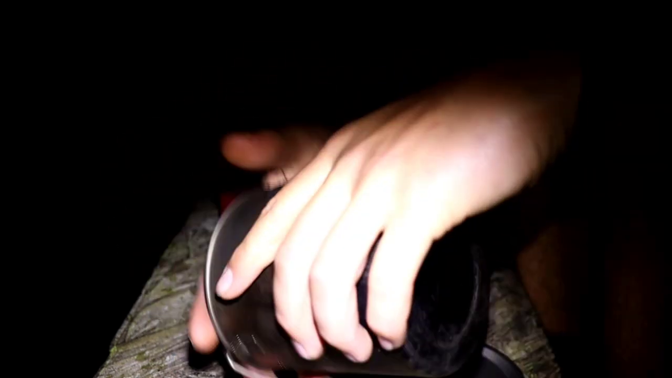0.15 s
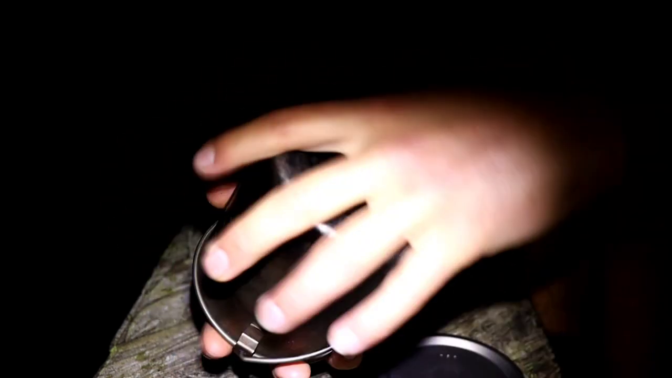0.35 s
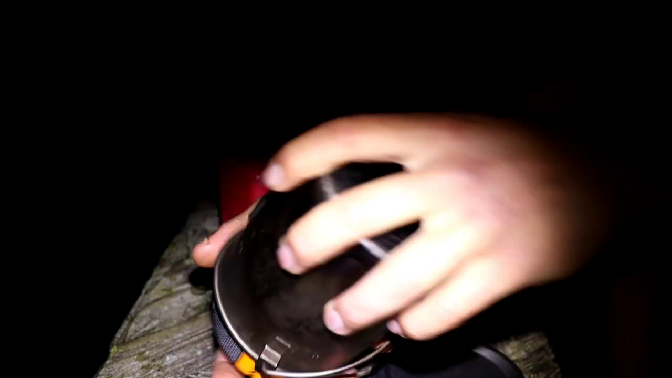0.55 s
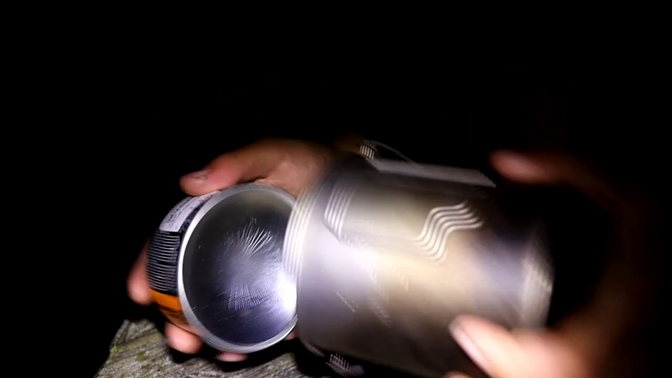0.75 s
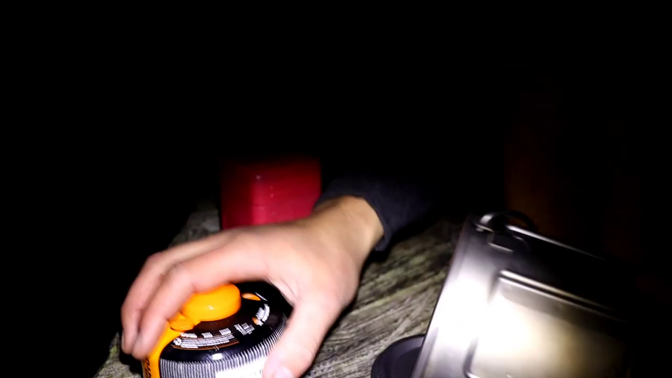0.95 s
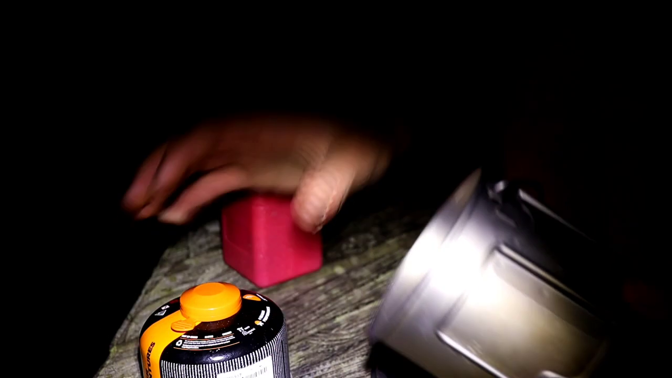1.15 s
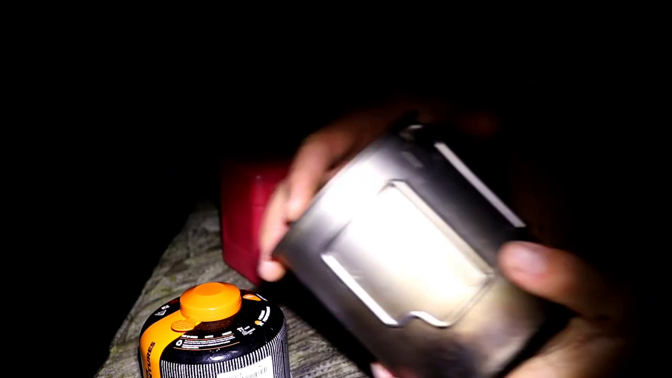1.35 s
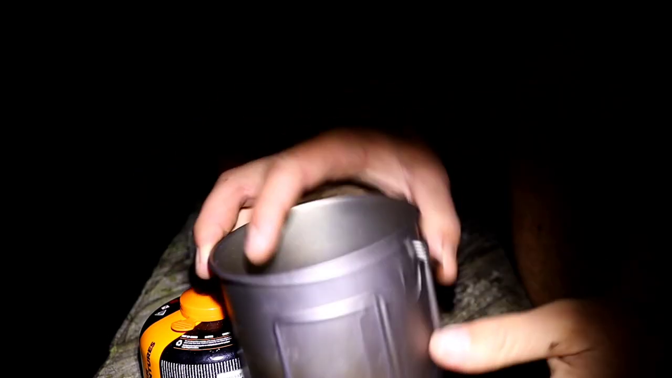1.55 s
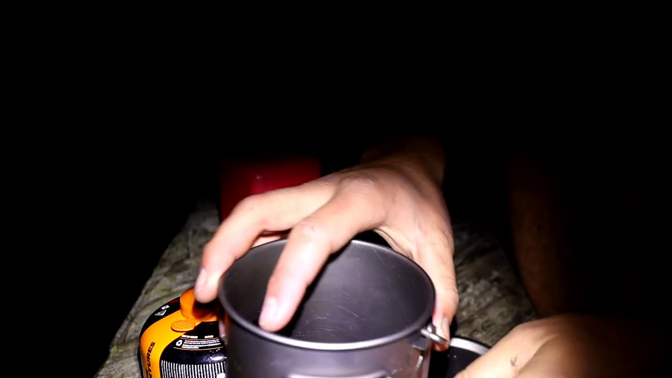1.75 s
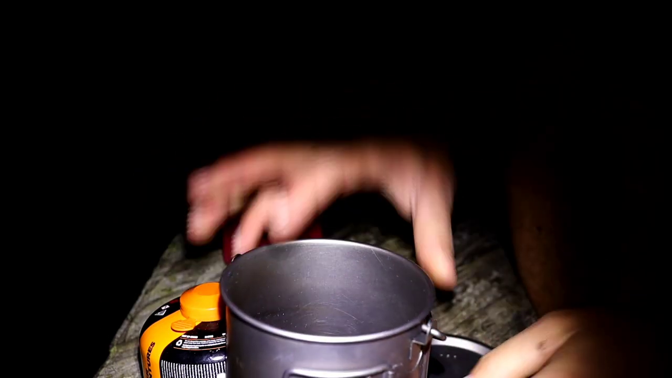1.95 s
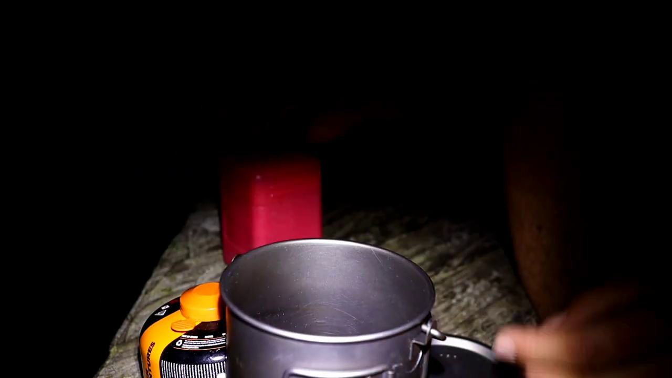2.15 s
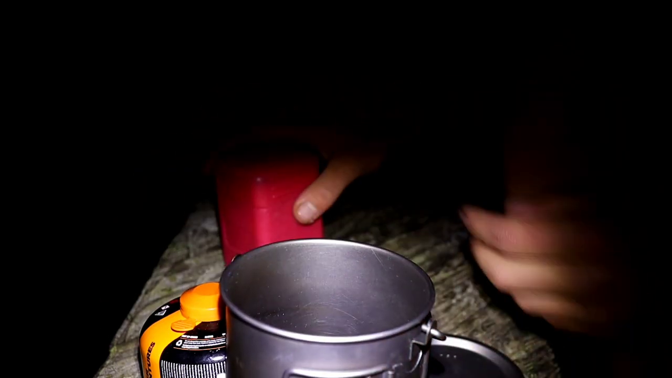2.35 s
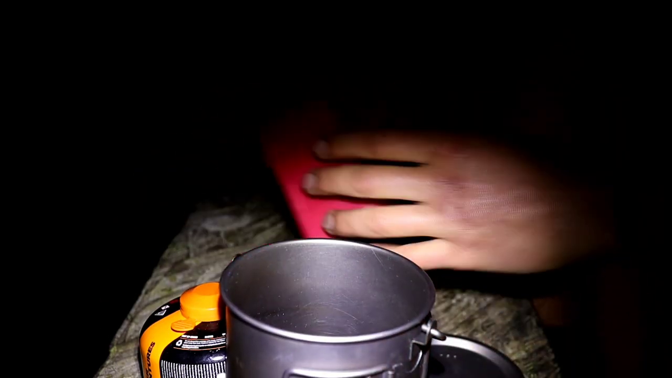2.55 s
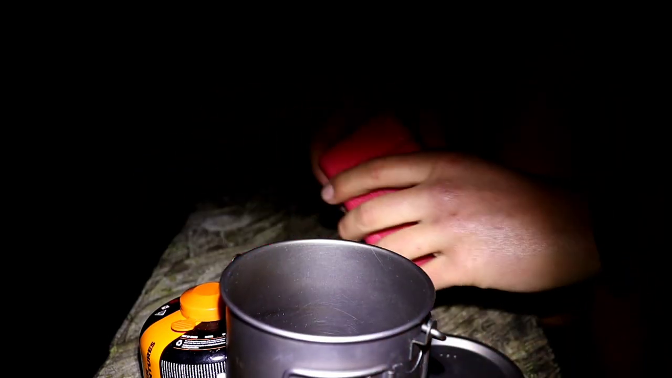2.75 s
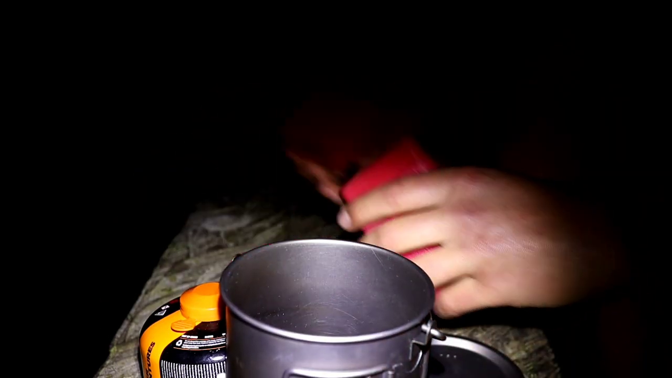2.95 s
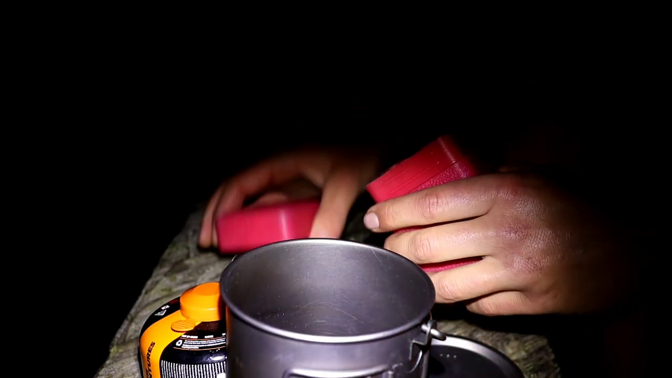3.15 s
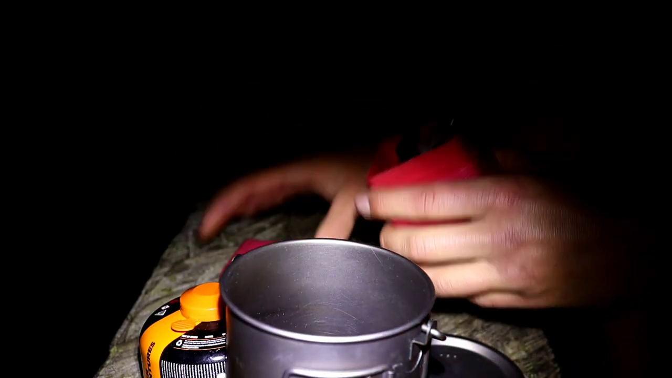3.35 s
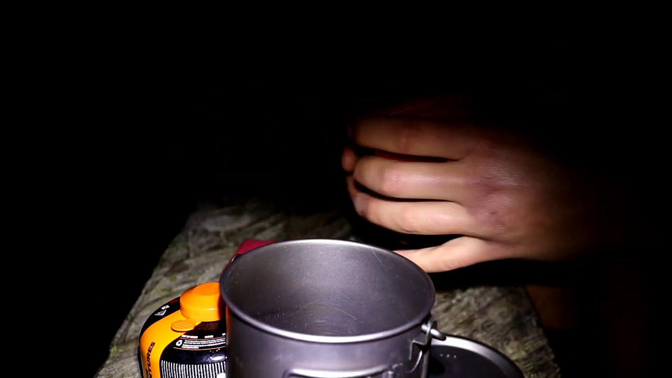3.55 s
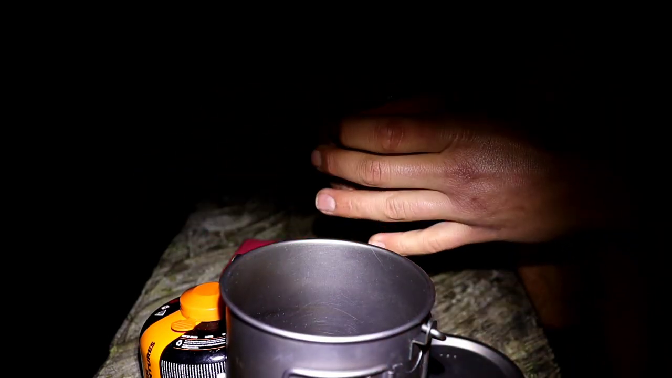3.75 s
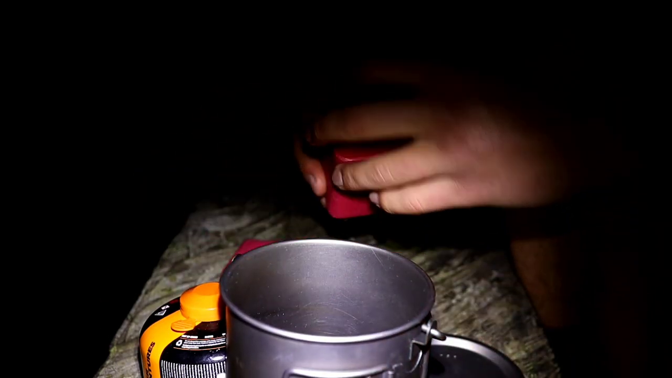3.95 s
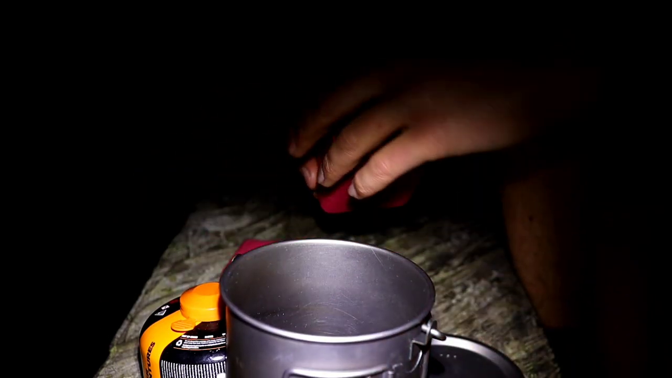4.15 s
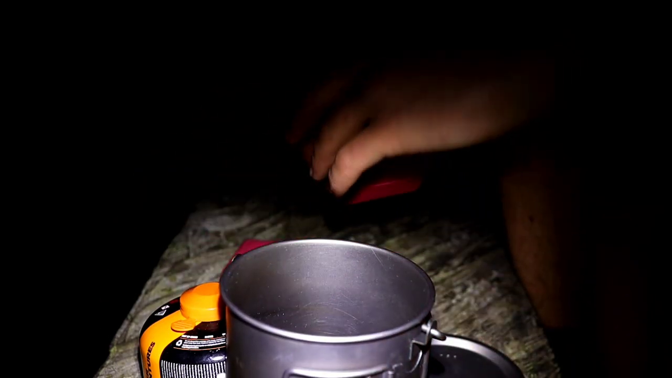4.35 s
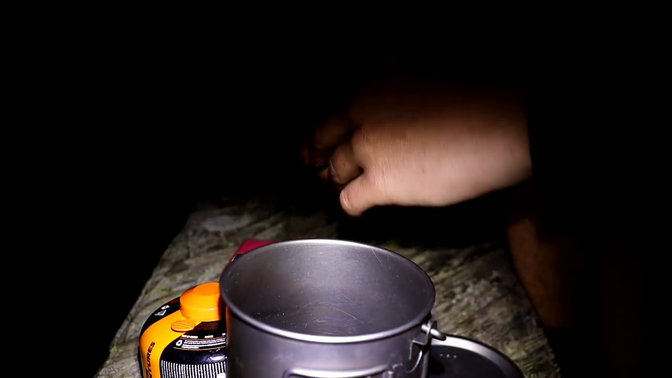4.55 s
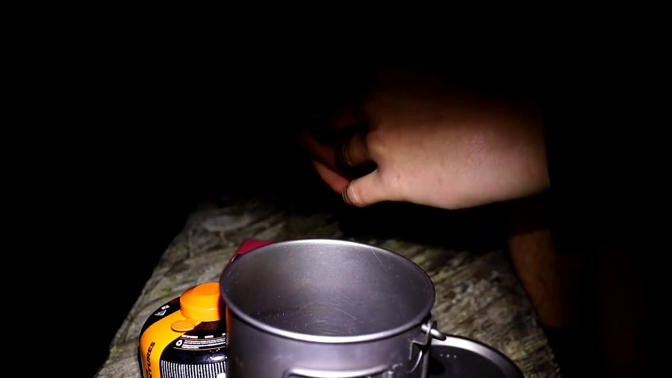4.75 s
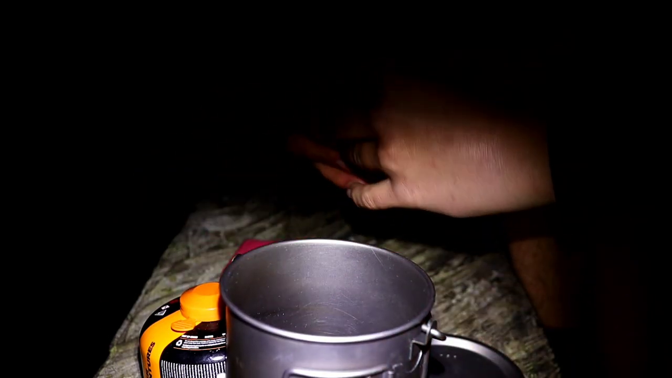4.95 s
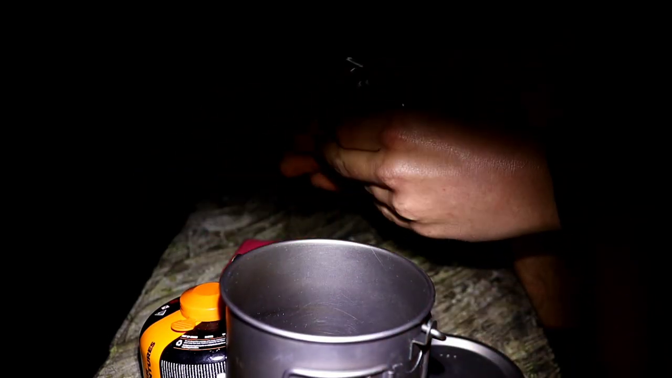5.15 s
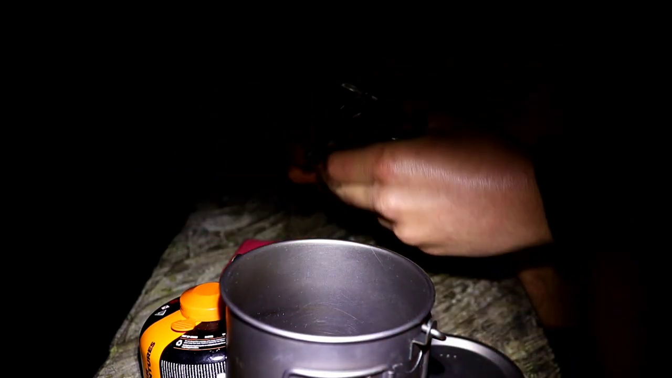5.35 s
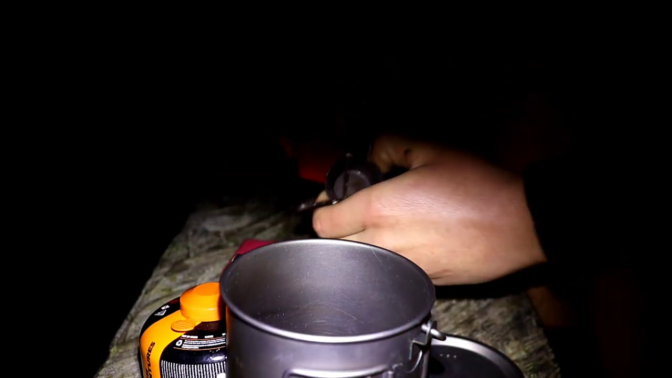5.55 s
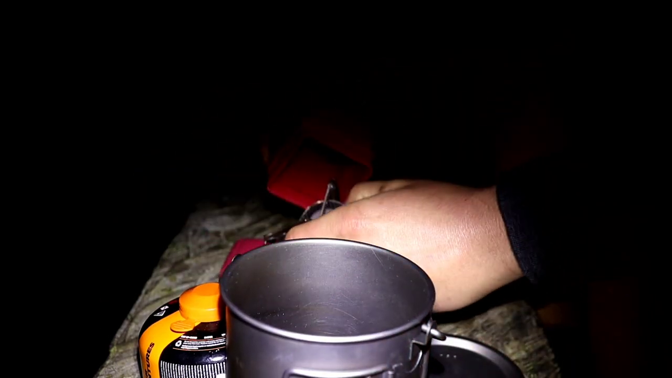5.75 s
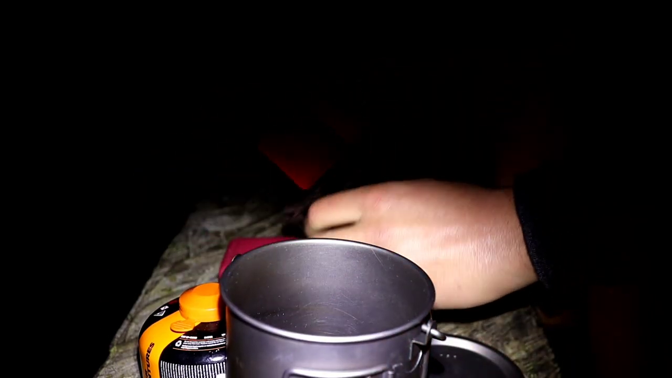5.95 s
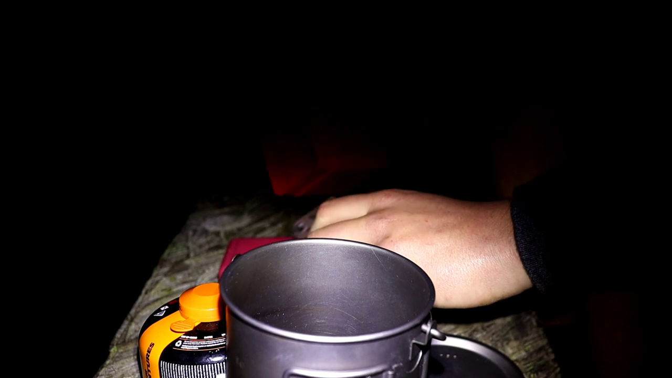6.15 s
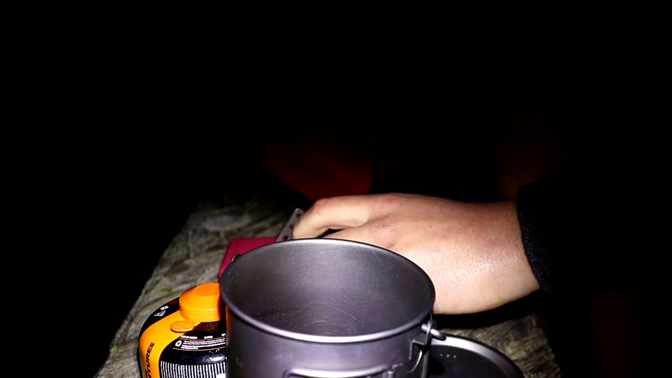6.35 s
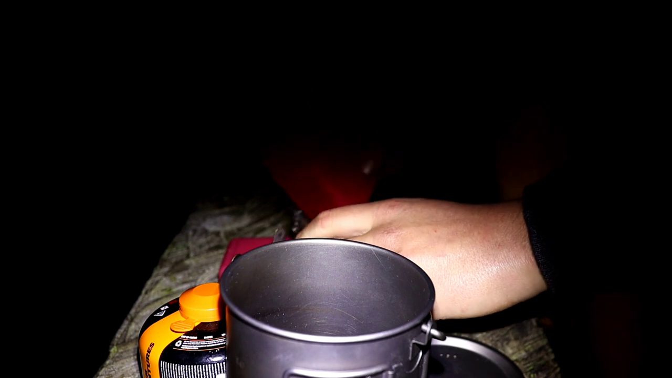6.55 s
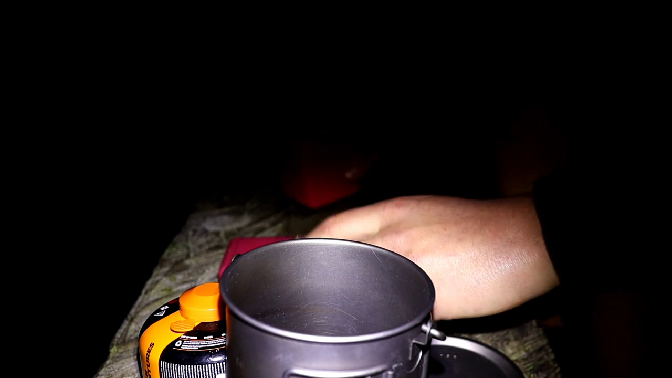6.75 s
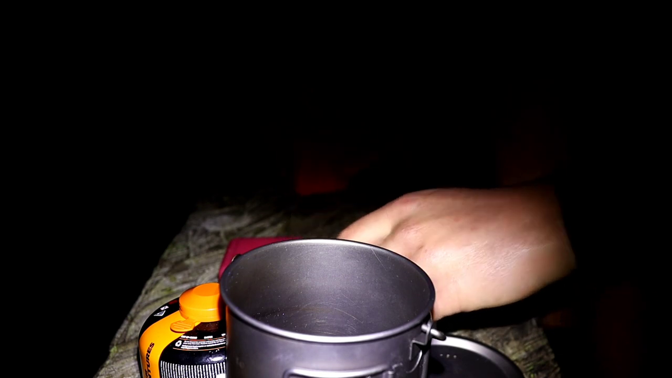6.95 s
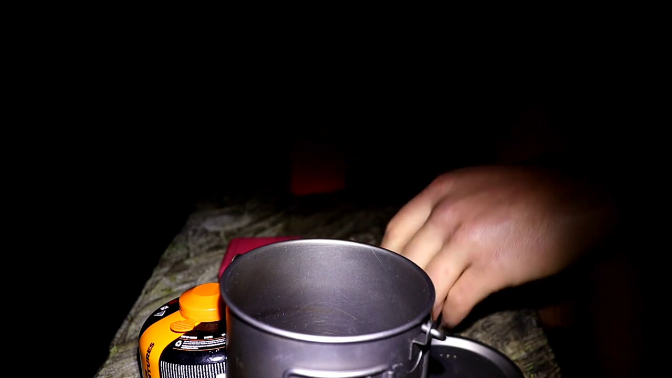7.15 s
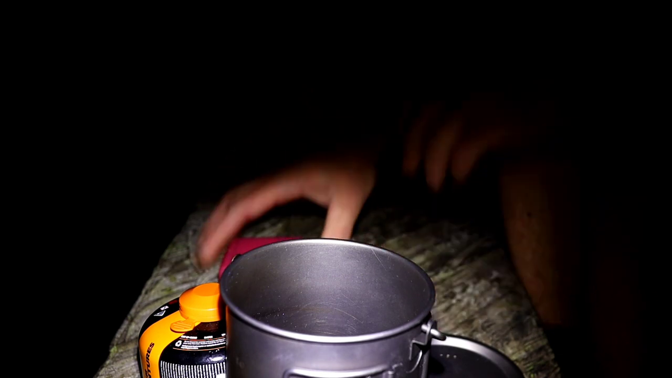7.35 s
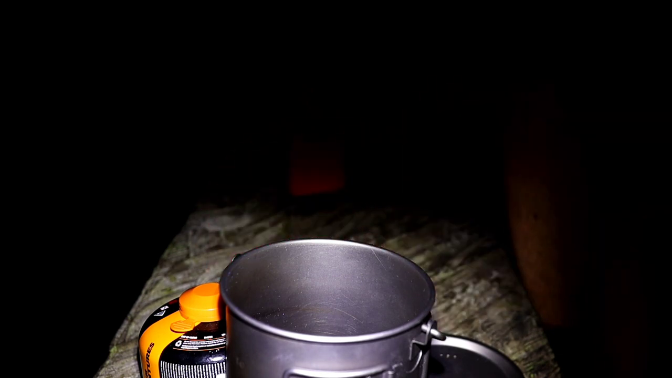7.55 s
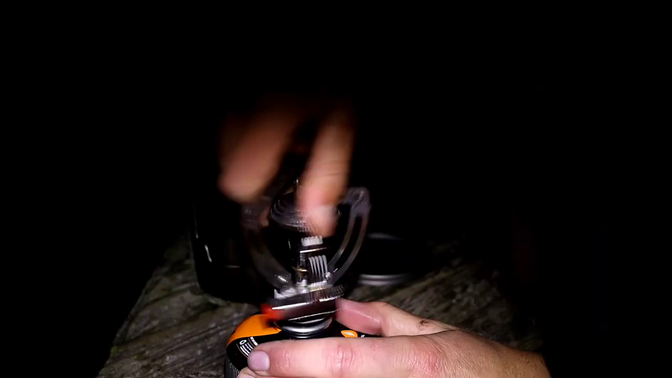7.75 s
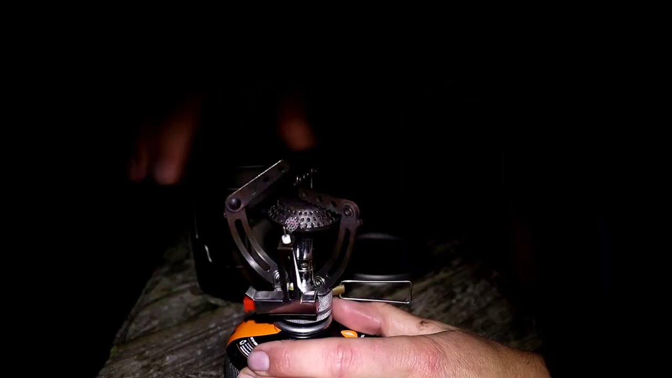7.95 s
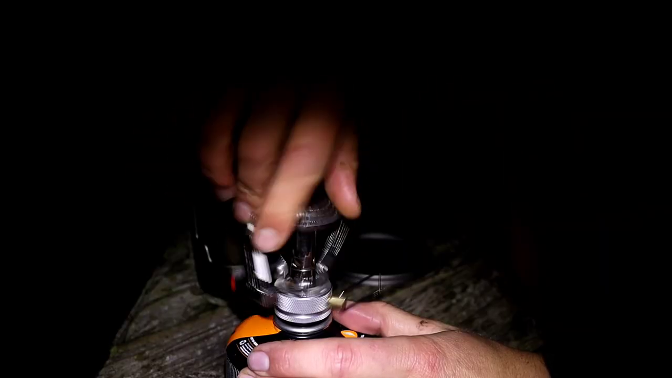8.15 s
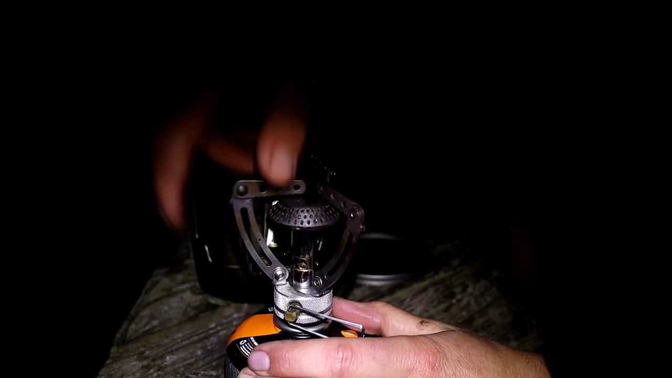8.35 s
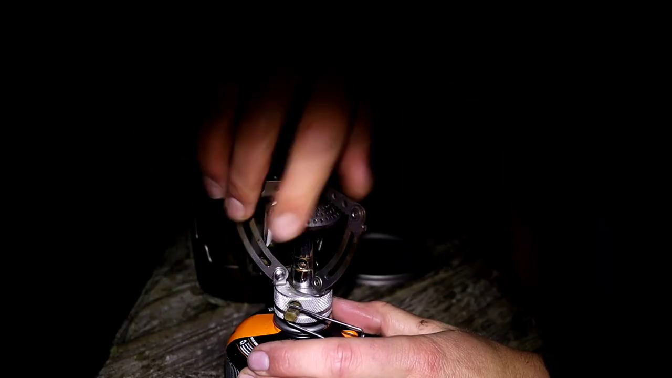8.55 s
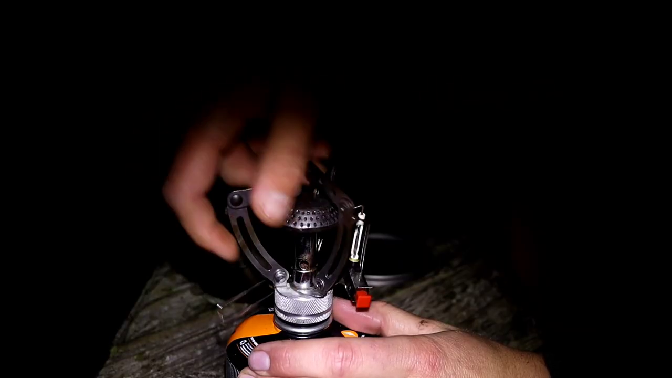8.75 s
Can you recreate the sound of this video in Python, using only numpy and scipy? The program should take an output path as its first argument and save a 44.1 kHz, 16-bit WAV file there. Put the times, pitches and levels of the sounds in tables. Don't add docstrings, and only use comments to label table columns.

```python
import sys
import numpy as np
from scipy import signal
from scipy.fft import rfft, irfft
from scipy.io import wavfile
from scipy.ndimage import uniform_filter1d

SR = 44100
rng = np.random.default_rng(int(sys.argv[2]) if len(sys.argv) > 2 else 0)


def unload_audio(sound):
    columns = np.transpose(np.atleast_2d(sound))
    steps = np.round(np.clip(columns, -1, 1) * 32767)
    wavfile.write(sys.argv[1], SR, steps.astype(np.int16))


def level_to_linear(level):
    exponent = np.asarray(level, float) / 20
    return 10 ** exponent


N = 388962


def evened(x):
    return x / np.sqrt(np.mean(x ** 2) + 1e-20)


def unit(taps):
    return taps / np.linalg.norm(taps)


def coloured(x, points):
    hz, db = np.transpose(points)
    grid = np.fft.rfftfreq(len(x), 1 / SR)
    curve_db = np.interp(np.log(grid + 1), np.log(hz + 1), db)
    return irfft(rfft(x) * level_to_linear(curve_db), len(x))


def taps_of(points):
    return unit(np.roll(coloured(np.eye(1, 1024)[0], points), 512))


def add(mix, s, sound):
    part = mix[max(round(s * SR), 0):][:len(sound)]
    part += sound[:len(part)]


def resonate(x, hz, width):
    turn = np.exp(2j * np.pi * np.cumsum(hz * np.ones(len(x))) / SR)
    r = np.exp(-np.pi * width / SR)
    return 2 * (turn * signal.lfilter([1 - r], [1, -r], x / turn)).real


def ring(modes, length_s, spread_db=0., detune=0.):
    t = np.arange(round(length_s * SR))[:, None] / SR
    hz, db, t60 = np.transpose(modes)
    luck = rng.standard_normal((2, len(hz)))
    wave = np.sin(2 * np.pi * hz * (1 + detune * luck[0]) * t)
    level_db = db + spread_db * luck[1] - 60 * t / np.maximum(t60, .005)
    return (level_to_linear(level_db) * wave).sum(1)


# f/Hz, level/dB per Hz
CRACK = [(2240, -29), (3800, -6), (8560, -5.5), (10900, -21.5), (13500, -12.5), (15700, -25.5),
         (16300, -43)]
# f/Hz, level/dB, T60/s
BOX = [(1915, -1.5, .012), (2427, 4, 0.0087), (2910, 7, 0.0059), (3527, -4, 0.013), (4300, -13.5, 0.018)]


def knock(hz, shell_db, crack_db, t60, cluster_db):
    t = np.arange(round(.13 * SR)) / SR
    places = np.linspace(-1.2, 1.4, 9) + rng.uniform(-.15, .15, 9)
    cluster = [(hz * np.exp(.3 * a), cluster_db - 6.5 - 3.5 * abs(a), t60 * .65) for a in places]
    hollow = ring([(hz, 0, t60)] + cluster, .13, 1.5) * (1 - np.exp(-t / 0.0014))
    rattle = rng.standard_normal(len(t)) * (level_to_linear(-60 * t / 0.015) + level_to_linear(-16.5 - 60 * t / 0.036))
    shell = signal.oaconvolve(rattle, unit(ring(BOX, .03, 2, .03)))[:len(t)]
    noise = rfft(coloured(rng.standard_normal(len(t)), CRACK))
    noise *= level_to_linear(3.0 * evened(uniform_filter1d(rng.standard_normal(len(noise)), size=120)))
    crack = evened(irfft(noise, len(t))) * (level_to_linear(-60 * t / 0.022) + level_to_linear(-18.5 - 60 * t / .07))
    blow = 0.73 * hollow + 1.086 * level_to_linear(shell_db) * shell + 0.93 * level_to_linear(crack_db) * crack
    blow = blow * (1 - np.exp(-t / 0.00033))
    for late, size in rng.random((3, 2)):
        add(blow, .0015 + 0.0092 * late, 0.41 * size * blow.copy())
    return blow / abs(blow).max() * level_to_linear(max(shell_db, crack_db, 0))


def blow(row, shell, t60):
    _, db, hz, crack_db = row[:4]
    return knock(hz, shell[0] + shell[1] * crack_db, crack_db, t60, shell[2])


def arches(rubs, jerks, jerk_edges_db=(-42, -50)):
    rows = []
    for strokes_of, (up, down) in [(rubs, (-13.5, -5.5)), (jerks, jerk_edges_db)]:
        for start, peak, end, hiss, low in strokes_of:
            rows.append([(start, hiss + up, low + up), (peak, hiss, low), (end, hiss + down, low + down)])
    return rows


def strokes(tables, grit_db, per_s):
    t, hiss, rumble = np.arange(N) / SR, np.zeros(N), np.zeros(N)
    for rows in tables:
        s, hiss_db, rumble_db = np.transpose(rows)
        inside = (t > s[0]) & (t < s[-1])
        hiss += inside * level_to_linear(np.interp(t, s, hiss_db))
        rumble += inside * level_to_linear(np.interp(t, s, rumble_db))
    grains = level_to_linear(grit_db * np.minimum(rng.exponential(1, N), 5)) * (rng.random(N) < per_s / SR)
    swell = evened(signal.lfilter([1], [1, -np.exp(-1 / (0.0017 * SR))], grains))
    grit = swell * rng.standard_normal(N)
    return uniform_filter1d(hiss, size=300) * grit, uniform_filter1d(rumble, size=300) * grit


def patchy(x, patchy_db):
    z = signal.stft(x, nperseg=256)[2]
    patches = uniform_filter1d(rng.standard_normal(z.shape), size=3, axis=0)
    patches = uniform_filter1d(patches, size=20, axis=1)
    return signal.istft(z * level_to_linear(patchy_db * evened(patches)), nperseg=256)[1][:N]


# f/Hz, level/dB per Hz
NIGHT = [(15, -38), (25, -1), (387, -11), (455, -15), (805, -5.5), (973, -13.5), (2800, -19), (4820, -16),
         (5670, -20.5), (15100, -27), (16300, -43.5)]
# width f/Hz, level/dB
CRICKETS = [(260, -72.5)]
# t/s, f/Hz
CRICKET_DRIFT = [(0, 4800), (2.2, 5000), (3.299, 5200), (4.602, 4750), (5.2, 5050), (6.5, 4900),
                 (8.82, 4800)]


def night():
    out = level_to_linear(-61) * evened(coloured(rng.standard_normal(N), NIGHT))
    t = np.arange(N) / SR
    hz = np.interp(t, *np.transpose(CRICKET_DRIFT))
    for width, db in CRICKETS:
        slow = uniform_filter1d(uniform_filter1d(rng.standard_normal(N), size=9000), size=9000)
        song_hz = hz * (1 + 0.013 * evened(slow))
        out += level_to_linear(db) * evened(resonate(resonate(rng.standard_normal(N), song_hz, width), song_hz, width))
    return out * level_to_linear(-3 * (t > 7.845))


def nearby_walls(x):
    slots = np.arange(200, 12000, 22)
    at = slots + rng.integers(0, 22, len(slots))
    taps = np.zeros(12100)
    taps[at] = rng.choice([-1., 1.], len(at)) * level_to_linear(-60 * at / SR / 0.18)
    dull = signal.lfilter([1], [1, -.6], taps)
    return signal.oaconvolve(x, unit(dull))[:N]


# f/Hz, level/dB, T60/s
PANEL = [(296, -7, 0.3), (323, -9, 0.15), (614, -18, 0.2), (1017, -17, 0.14), (440, 0, 0.05),
         (563, -10.5, 0.078), (702, -3, 0.13), (930, -10.5, 0.028), (1145, -6, 0.1), (1280, -11.5, 0.13)]
# t/s, boom peak level/dB, panel ring re boom level/dB
THUMPS = [(0.0, -43.5, -8.5), (1.077, -21.5, 4), (1.113, -19.5, 1), (1.823, -25, 9), (2.007, -35.5, 4),
          (2.449, -32, -29), (3.434, -35.5, -8.5), (5.694, -23.5, 2), (5.824, -27.5, -2.5),
          (5.937, -28, -8.5), (6.216, -18.5, 2), (6.81, -40, -10.5), (6.957, -25, -1), (7.21, -39, 5),
          (7.533, -27.5, -27), (7.842, -30.5, -26), (7.865, -49, -21), (7.915, -36.5, -17),
          (7.985, -43, -8), (8.04, -36.5, -11), (8.268, -50, -9), (8.312, -30, -11), (8.36, -30, -11),
          (8.482, -35.5, -14), (8.52, -39.5, -14), (8.609, -36.5, -37.5), (8.8, -30, -13.5),
          (8.768, -29.5, -17)]
BOOM_HZ, BOOM_T60 = 75.4, 0.5


def table_thumps():
    out, t = np.zeros(N), np.arange(round(.6 * SR)) / SR
    sway_hz, sway_t60 = 41, 1
    for s, db, panel_db in THUMPS:
        sway_db = -25 - 0.5 * db
        low_modes = [(BOOM_HZ, 0, BOOM_T60), (sway_hz, sway_db, sway_t60), (sway_hz * .75, sway_db - 5, sway_t60)]
        low = ring(low_modes, len(t) / SR, 0, .01) * (1 - np.exp(-t / 0.0024))
        settling = (t == 0) + .35 * unit(rng.standard_normal(len(t)) ** 3 * level_to_linear(-60 * t / 0.025))
        panel = signal.oaconvolve(ring(PANEL, len(t) / SR, 2, .005), settling)[:len(t)]
        add(out, s, level_to_linear(db) * (low + level_to_linear(panel_db) * panel) * np.cos(np.pi * t / t[-1] / 2))
    return out


# t/s, boom level/dB
TWISTING = [
    (7.6, -43),
    (7.756, -64),
    (7.894, -35),
    (8.272, -47.5),
    (8.31, -34),
    (8.82, -44),
]


def table_twisting():
    out = np.zeros(N)
    s, db = np.transpose(TWISTING)
    t = np.arange(s[0], s[-1], 1 / SR)
    push = rng.standard_normal(len(t))
    shaken = evened(resonate(push, BOOM_HZ, 2.6)) + level_to_linear(-24) * evened(resonate(push, PANEL[0][0], 18.0))
    add(out, s[0], level_to_linear(np.interp(t, s, db) - 11.5) * shaken * signal.windows.tukey(len(t), .1))
    return out


# t/s, blow peak level/dB, hollow f/Hz, crack re blow level/dB
CAN_HITS = [
    (1.077, -4.5, 1280, -60),
    (1.113, -10, 1150, -39),
]


def can():
    out = np.zeros(N)
    for row in CAN_HITS:
        add(out, row[0], level_to_linear(row[1]) * blow(row, (-27.5, .38, -1.5), 0.011))
    return out


# f/Hz, level/dB, T60/s
EMPTY = [(964, -9, 0.08), (1077, -3, 0.08), (1174, -2, 0.08), (1273, -4, .09), (2430, -2, 0.1),
         (2940, -4, 0.058), (3120, -8.5, .05), (4300, -10.5, 0.085)]
# t/s, blow peak level/dB, hollow f/Hz, crack re blow level/dB
BOX_HITS = [(2.476, -24.5, 807, -9.5), (2.545, -22, 800, -9), (2.569, -31.5, 475, -8),
            (2.674, -11, 561, -53.5), (2.695, -23.5, 563, -1), (2.803, -32, 600, -2.5),
            (2.862, -28.5, 708, -20.5), (2.9, -27.5, 516, -21), (3.025, -16, 673, -18.5),
            (2.993, -35, 880, -17), (3.065, -12, 800, -12), (3.072, -2.5, 781, -15.5),
            (3.097, -11, 855, -9), (3.121, -15, 766.7, -17.5), (3.162, -30, 900, -14),
            (3.259, -29, 800, -17.5), (3.264, -14, 848, -26.5), (3.394, -24.5, 780, -24),
            (3.436, -4, 1153, -36.5), (3.453, -6, 1100, -36), (3.446, -16, 1150, -40),
            (3.463, -12, 1100, -40), (3.468, 0.5, 1114, -35), (3.483, -16, 1120, -40),
            (3.527, -20, 1100, -40), (3.546, -24, 1150, -40), (3.472, -7, 1199, -32),
            (3.497, -7.5, 1099, -37.5), (3.509, -13.5, 1235, -41.5), (3.517, -10.5, 1023, -35.5),
            (3.538, -18.5, 1143, -44), (3.564, -29, 1250, -27.5), (3.64, -28.5, 870, 0),
            (3.657, -22.5, 778, -26.5)]
TUGS = [(3.87, -29.5, 1054, -38), (3.92, -31, 890, -22), (3.926, -14.5, 877, -17), (4.202, -36, 770, -34),
        (4.227, -34.5, 600, -21.5), (4.254, -28.5, 576, -29), (4.268, -22.5, 615, -9),
        (4.43, -38.5, 760, -20), (4.531, -35, 765, -16), (4.586, -46, 818, -15.5), (4.879, -36, 600, -20),
        (4.898, -37, 700, -14), (5.055, -41.5, 700, -37), (4.384, -25.5, 747, -20.5),
        (4.732, -27, 780, -57), (4.916, -32, 790, -41), (5.103, -35, 452, -13.5),
        (5.226, -21.5, 576, -36.5), (5.248, -19, 794, -7), (5.263, -12, 627, -21.5),
        (5.277, -10.5, 600, -8), (5.286, -9, 700, -13.5), (5.293, -1, 690, -24), (5.299, -11.5, 760, -7),
        (5.399, -33.5, 720, -28), (5.312, -22, 1037, 2), (5.329, -26, 576, 4)]
TICKS = [(7.74, -46, 900, -15), (7.798, -32, 943, -43), (7.838, -30, 170, -42), (8.267, -47, 400, -17),
         (8.495, -40, 450, -16), (7.842, -38, 452, 4), (7.909, -42, 517.4, 8), (7.958, -43.5, 813, -8),
         (7.984, -34.5, 765, -8.5), (8.039, -36, 724, -10), (8.057, -34.5, 1170, -2.5),
         (8.304, -29.5, 700, -18.5), (8.324, -34, 740, -15.5), (8.336, -40, 1150, -24),
         (8.475, -41, 1200, -26), (8.52, -47, 1200, -22), (8.365, -32.5, 452, -48), (8.462, -37, 1200, -30),
         (8.757, -37, 1180, -6), (8.8, -33, 416.5, 6)]
LATE_HITS = [(6.206, -25.5, 1020, -32), (6.216, -7.5, 693, -74), (6.651, -44, 900, -9),
             (6.746, -38.5, 720, -13), (6.814, -35, 999, -16.5), (6.925, -40.5, 444, -31.5),
             (6.957, -7.5, 696, -29), (6.974, -9.5, 964, -31), (6.984, -15.5, 700, -26),
             (6.995, -11.5, 920, -31.5), (7.011, -18, 912, -33), (7.034, -27.5, 720, -22),
             (7.085, -22.5, 410, -1), (7.109, -24, 682.4, -8), (7.12, -25.5, 720, -17),
             (7.178, -14.5, 875, -36.5), (7.211, -13.5, 848, -43.5), (7.271, -26, 959, -56),
             (7.245, -37, 720, -40), (7.305, -42, 1100, -29), (7.49, -45, 950, -30),
             (7.527, -33.5, 910, -21.5), (7.533, -11, 936, -33.5), (7.551, -21, 1130, -19)]
BOX_DROP = (5.823, -3, 1100, -32)
# f/Hz, level/dB, T60/s
DROP_WALLS = [(2430, -9, .03), (3000, -7, .025)]
EMPTY_HZ = 950


def empty_ring(row):
    return level_to_linear(row[1] - 21) * ring(EMPTY, .12, 3.5, .015)


def box_knocks():
    out = np.zeros(N)
    for row in TICKS:
        add(out, row[0], level_to_linear(row[1] - 24) * ring(PANEL, .2, 3.98))
    late_modes = PANEL[6:] + EMPTY[5:7]
    for row in LATE_HITS:
        s, db, hz, _ = row
        add(out, s, level_to_linear(db) * blow(row, (-12, 0.27, -2), 0.027))
        contact_modes = [(hz, 0, .1), (690, 6, .11), (1750, -8, .05)]
        add(out, s, level_to_linear(db - 27) * ring(late_modes + contact_modes, .2, 3, .01))
    for row in BOX_HITS + TUGS + TICKS:
        t60 = 0.025 if row[2] < EMPTY_HZ else 0.021
        add(out, row[0], level_to_linear(row[1]) * blow(row, (-4.5, 0.35, -0.97), t60))
    add(out, BOX_DROP[0], level_to_linear(BOX_DROP[1]) * blow(BOX_DROP, (-15, 0, -3), 0.02))
    add(out, BOX_DROP[0], ring(DROP_WALLS, .1))
    for row in [BOX_DROP] + BOX_HITS:
        if row[2] > EMPTY_HZ:
            add(out, row[0], empty_ring(row))
    return out


# f/Hz, level/dB per Hz
RUSTLE = [(880, -48), (1500, 3), (7650, -5.5), (8710, -3), (10200, -25), (13800, -10.5), (16300, -42.5)]
# start t/s, peak t/s, end t/s, hiss level/dB, hollow rumble level/dB
BOX_RUBS = [(2.38, 2.5, 2.63, -53.5, -50), (2.68, 2.76, 2.96, -52, -52), (3.635, 3.67, 3.72, -50, -44),
            (3.78, 3.87, 3.96, -49.5, -61), (4.16, 4.24, 4.3, -58.5, -50), (4.37, 4.41, 4.47, -52, -52),
            (4.44, 4.53, 4.555, -54, -52), (4.72, 4.76, 4.82, -56, -54), (4.86, 4.9, 4.95, -53.5, -43.5),
            (5.03, 5.08, 5.1, -60, -52), (6.39, 6.43, 6.5, -62, -53), (7.66, 7.8, 7.843, -55, -66),
            (5.69, 5.71, 5.78, -48, -44), (5.46, 5.51, 5.6, -47, -46), (8.29, 8.32, 8.39, -62, -51),
            (8.455, 8.475, 8.54, -64, -52), (8.75, 8.77, 8.82, -60, -54)]
BOX_JERKS = [
    (2.948, 3.063, 3.18, -33.5, -23),
    (5.205, 5.283, 5.437, -18.5, -26),
    (6.173, 6.231, 6.328, -42, -45.5),
]


def box_rubs():
    hiss, rumble = strokes(arches(BOX_RUBS, BOX_JERKS), 2.8, 2200)
    out = patchy(signal.oaconvolve(hiss, taps_of(RUSTLE), "same"), 1.8)
    out += level_to_linear(-19) * signal.oaconvolve(hiss, unit(ring(BOX, .05)))[:N]
    hollow = [(700, 11.0, 0.0057), (896, -3.5, .025), (1150, 4.5, 0.011), (520, -28, 0.0059), (220, -3, 0.01)]
    return out + signal.oaconvolve(rumble, unit(ring(hollow, 0.061)))[:N]


# t/s, blow peak level/dB, hollow f/Hz, crack re
# blow level/dB
BURNER_HITS = [(5.464, -9.5, 700, -16), (5.487, -15, 631, -9), (5.502, -9.5, 708, -7.5),
               (5.517, -19, 700, -2), (5.526, -16.5, 716, -18.5), (5.533, -12.5, 769, -14.5),
               (5.54, -17.5, 768, -9), (5.623, -11, 874.5, -8), (5.693, -4, 689, -8),
               (5.732, -7, 720, -14.5), (5.852, -5.5, 1138, -20), (5.869, -8, 1155, -33),
               (5.906, -18, 708, -6.5), (5.934, -7, 1085, -51.5), (5.956, -16.5, 1022, -32),
               (5.97, -19, 1104, -45), (5.99, -25.5, 1100, -30), (6.002, -31.5, 1056, -42.5),
               (5.839, -17, 1200, -30.5), (6.019, -29.5, 970, -35), (6.07, -36, 723, -9),
               (6.116, -37.5, 680, -15)]
# f/Hz, level/dB, T60/s
BURNER = [(2930, -3, .1), (4285, 0, .06), (4619, -3, .15), (6083, -2, .15), (6988, -3, .18)]
# t/s, level/dB
ARM_RINGS = [
    (5.853, -31),
    (5.503, -37),
]


def burner():
    out = np.zeros(N)
    for row in BURNER_HITS:
        s, db, hz, _ = row
        if hz > EMPTY_HZ:
            add(out, s, empty_ring(row))
        hit = blow(row, (-12, 0.38, -3), 0.061) if hz < EMPTY_HZ else blow(row, (-15.5, 0.12, -1.5), 0.028)
        add(out, s, level_to_linear(db) * hit)
    for s, db in ARM_RINGS:
        add(out, s, level_to_linear(db) * ring(BURNER, .052, 1.5, .002))
    return out


# f/Hz, level/dB, T60/s
MUG = [(781, -14.5, .16), (942, -17.5, .2), (1384, -16.5, 1.3), (2214, -13.5, .09), (2541, -14.5, 0.27),
       (3268, -19, 0.12), (3560, -11, .11), (4048, -19.5, 0.15), (4720, -15.5, 0.077), (6132, -16, 0.051),
       (6900, -17, .09), (7800, -22, .1)]
NESTED = [(802, -3, 0.1), (1397, -23.5, 0.77), (2099, -17, 0.1), (2340, -9, 0.06), (2570, -25, 0.35),
          (3180, -24, .11), (3643, -15.5, .06), (4048, -26.5, 0.11), (4530, -26, 0.047)]
HELD_MUG = [(583, -8, .25), (750, 3, .23), (1392, -12, .2)] + [(hz, db - 4, t60) for hz, db, t60 in MUG[3:]]
# t/s, blow peak level/dB, hollow f/Hz, crack and free ring re blow level/dB
MUG_HITS = [(0.075, -44, 800, -20, -30), (0.118, -31.5, 730, -40, -26.5), (0.126, -22.5, 825, -39.5, -21),
            (0.145, -18.5, 520, -29.5, -16), (0.163, -10, 542, -6, -6), (0.169, -12.5, 800, -3.5, -12),
            (0.175, -17, 544, -4, -10), (0.188, -19, 486, -19.5, -18), (0.199, -17.5, 520, -25, -14),
            (0.238, 3, 531, -23.5, -9), (0.279, -11.5, 526, -21.5, -15), (0.289, -17.5, 700, -2.5, -21),
            (0.309, -11, 522, -8, -9.5), (0.315, -8.5, 780, -13.5, -14.5), (0.321, -12, 790, -30.5, -10),
            (0.378, -12, 461, -28, -12), (0.456, -34, 374, -18, -23.5), (0.531, -19.5, 305, -15, -8.5),
            (0.551, -15, 307, -6, -14.5), (0.607, -30.5, 300, -16, -20), (0.654, -30.5, 300, -23.5, -20),
            (0.746, -25.5, 420, -18.5, -22), (0.771, -31, 493, -16, -17), (0.722, -26.5, 590, -7, -5),
            (0.733, -22.5, 388, -13.5, -3), (0.82, 0, 1045, -3.5, -12.5), (0.827, -8, 940, -0.5, -29),
            (0.839, -11.5, 1000, -4, -4)]
# t/s, blow peak level/dB, hollow f/Hz, crack re blow level/dB
MUG_SET = [
    (1.459, -39, 770, 2),
    (1.531, -17.5, 790, 0),
    (1.824, 1, 610, -15),
    (1.93, -31, 548, -19.5),
    (2.007, -18.5, 745, -21),
    (2.052, -30, 750, -20),
    (2.062, -19, 756, -37),
]
GRIPS = [.62, 1.07, 1.72, 1.98, 2.14]


def mug_knocks():
    out = np.zeros(N)
    set_down = [(*hit, -16 - 0.15 * hit[1]) for hit in MUG_SET]
    for row in MUG_HITS + set_down:
        s, db, hz, _, ring_db = row
        modes = NESTED if s < .43 else MUG if s < GRIPS[1] else HELD_MUG
        free = ring(modes, .45, 2, .001)
        next_grip = min(g for g in GRIPS if g > s)
        held = np.maximum(np.arange(len(free)) / SR + s - next_grip, 0)
        shell = (-3.5, .65, -10) if s < GRIPS[1] else (-9, .45, -1.7)
        add(out, s, level_to_linear(min(db, .3)) * blow(row, shell, 24 / hz))
        add(out, s, level_to_linear(db + ring_db) * free * level_to_linear(-60 * held / .04))
    return out


# start t/s, peak t/s, end t/s, hiss level/dB, hollow rumble level/dB
MUG_RUBS = [(.06, .3, 0.49, -49.5, -40), (.43, .49, .54, -37, -62), (.53, .63, 0.78, -45, -49),
            (.715, .8, 0.85, -35.5, -39.5), (1.453, 1.475, 1.53, -53, -57), (1.52, 1.59, 1.615, -46, -58),
            (1.57, 1.63, 1.77, -58, -62.5), (1.78, 1.81, 1.825, -52, -58), (1.83, 1.86, 1.99, -56, -54),
            (2.0, 2.02, 2.1, -52, -58)]
MUG_JERKS = [
    (0.787, 0.824, 0.88, -20, -29.5),
]


def mug_rubs():
    hiss, rumble = strokes(arches(MUG_RUBS, MUG_JERKS), 2.5, 2500)
    out = patchy(signal.oaconvolve(hiss, taps_of(CRACK) + .7 * taps_of(RUSTLE), "same"), 2.6)
    out += level_to_linear(-13) * signal.oaconvolve(hiss, unit(ring(MUG[3:], .25)))[:N]
    hollow = [(764.0, 0.5, 0.054), (595, -1.5, 0.042), (1100, 0.5, 0.026), (1372, -20, 0.93)]
    return out + signal.oaconvolve(rumble, unit(ring(hollow, 0.44)))[:N]


# start t/s, length t/s, f/Hz, level/dB
SQUEAKS = [(.5, 0.023, 8200, -30), (.59, .08, 3250, -40), (.62, 0.06, 3800, -45), (.53, 0.2, 780, -45),
           (.76, .03, 5200, -42), (1.59, 0.075, 8000, -58), (1.47, .13, 2214, -52)]


def mug_squeaks():
    out = np.zeros(N)
    for s, length, hz, db in SQUEAKS:
        drive = rng.standard_normal(round(length * SR))
        tone = evened(resonate(resonate(drive, hz, 110), hz, 110))
        add(out, s, level_to_linear(db) * tone * np.hanning(len(drive)))
    return out


# t/s, f/Hz, level/dB, T60/s
AIR_RINGS = [(.38, 483, -13, 0.15), (.553, 293.6, -24, 0.34), (.655, 306, -28.5, .13),
             (0.001, 1388, -48, .25), (.42, 1385, -37, .9), (1.283, 760, -50, .08), (5.623, 867, -6, .055),
             (5.624, 684, -14, .06)]
# t/s, f/Hz, level/dB
CAVITY = [(0.399, 470, -43.5), (0.444, 440, -53), (0.492, 310, -50), (0.571, 291.3, -37.5),
          (0.7, 300, -47.5), (0.755, 410, -39.5), (0.84, 592, -39.5)]


def mug_air():
    out = np.zeros(N)
    for s, hz, db, t60 in AIR_RINGS:
        fade = np.cos(np.linspace(0, np.pi / 2, round(.25 * SR)))
        add(out, s, ring([(hz, db, t60)], .25) * fade)
    s, hz, db = np.transpose(CAVITY)
    t = np.arange(s[0], s[-1], 1 / SR)
    scrapes = rng.standard_normal(len(t)) * rng.exponential(1, len(t)) ** 2
    air = evened(resonate(scrapes, np.interp(t, s, hz), 31))
    add(out, s[0], level_to_linear(np.interp(t, s, db)) * air * signal.windows.tukey(len(t), .1))
    return out


def scene():
    background = night() + table_thumps() + table_twisting()
    gear = can() + box_knocks() + box_rubs() + burner()
    gear += mug_knocks() + mug_rubs() + mug_squeaks() + mug_air()
    gear = signal.sosfilt(signal.butter(1, 260, "high", fs=SR, output="sos"), gear)
    return (background + gear + level_to_linear(-17.0) * nearby_walls(gear))[None]


def band_limit(x):
    return signal.sosfilt(signal.butter(12, 16490, fs=SR, output="sos"), x)


def record(dry):
    return band_limit(np.clip(dry, -.99, .99))


dry = scene()
out = record(dry)
unload_audio(out)
```